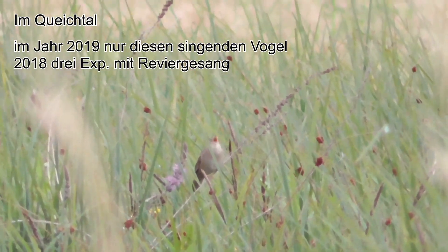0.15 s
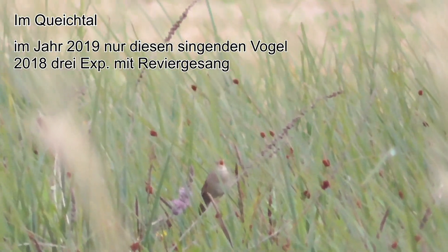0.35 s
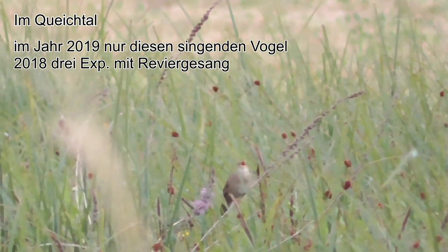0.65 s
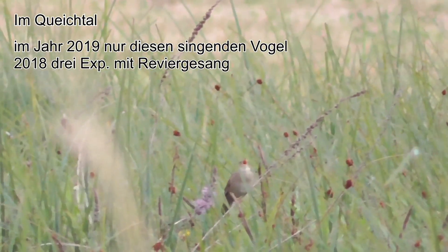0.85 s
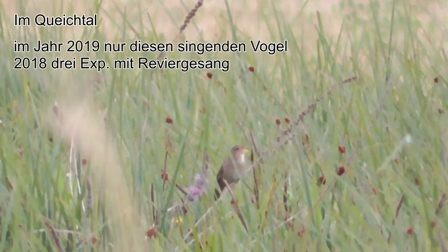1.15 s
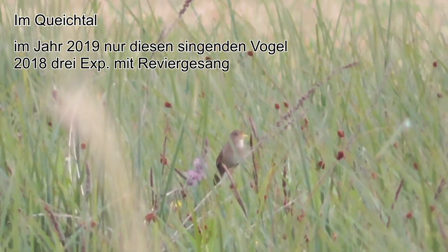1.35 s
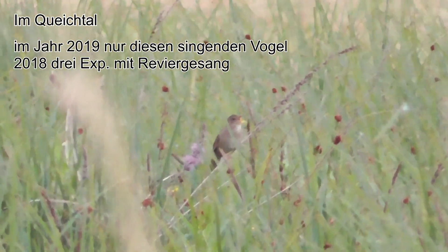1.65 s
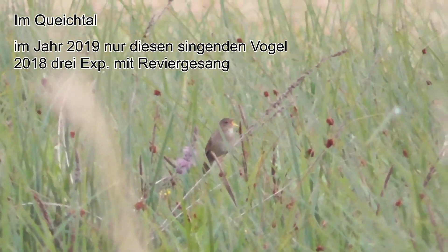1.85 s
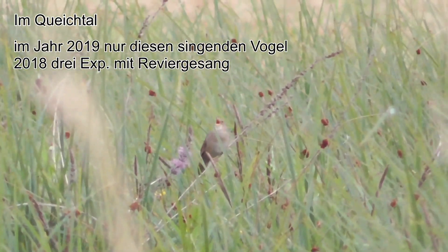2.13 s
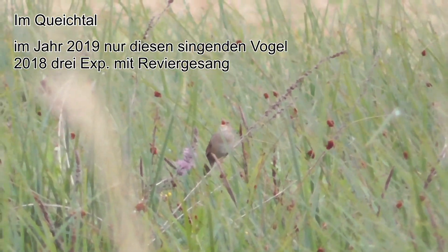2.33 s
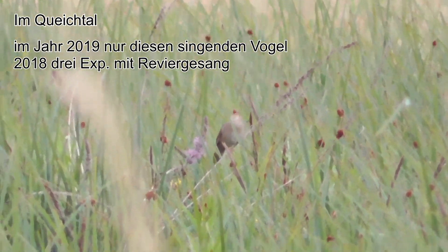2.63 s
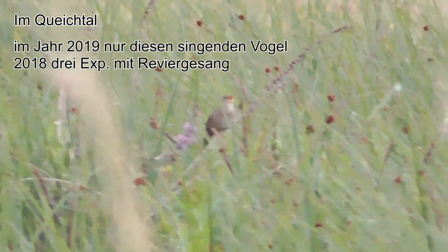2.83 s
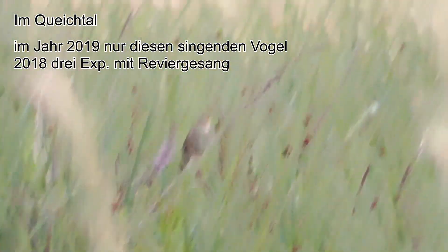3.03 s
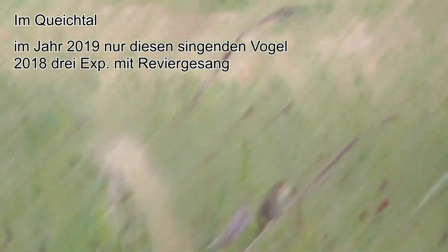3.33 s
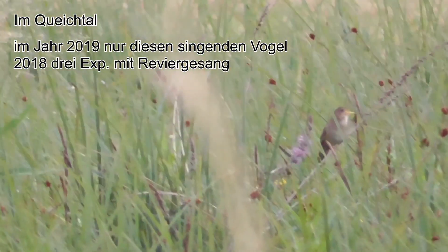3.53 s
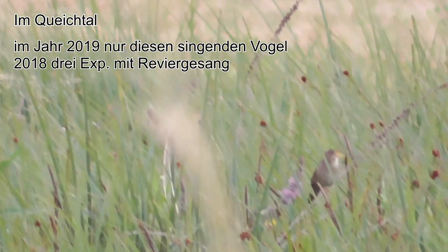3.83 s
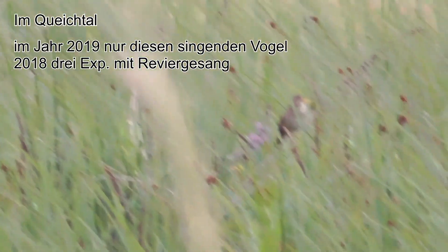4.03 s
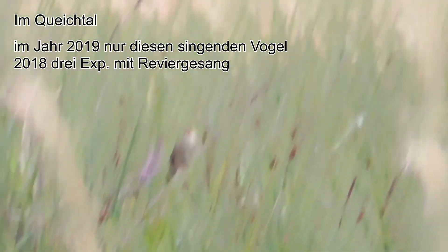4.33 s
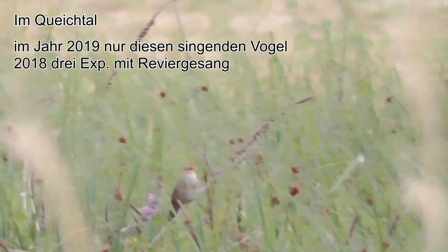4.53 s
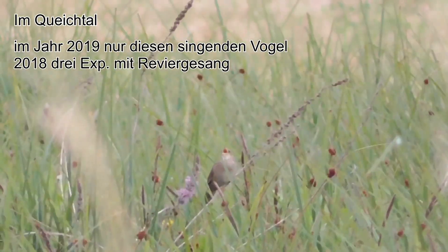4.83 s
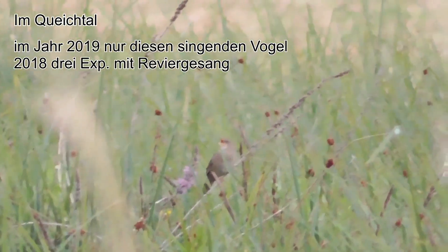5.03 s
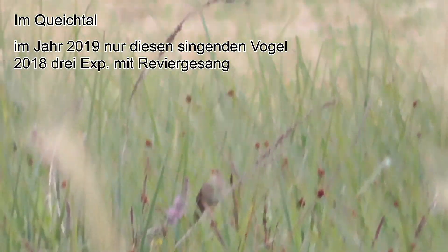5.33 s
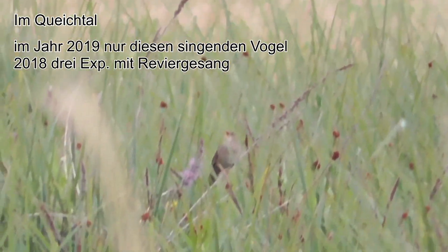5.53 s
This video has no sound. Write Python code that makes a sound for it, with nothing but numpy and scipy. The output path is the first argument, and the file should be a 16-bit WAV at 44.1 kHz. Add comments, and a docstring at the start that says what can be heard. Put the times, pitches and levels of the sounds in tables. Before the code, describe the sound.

In an open meadow, a thin mechanical bird trill rises and continues beneath harsh pulsing cricket chirps, with faint traffic and camera clicks.

```python
"""Close up, a bush-cricket rasps in double strokes, in three runs, as a grasshopper warbler's reel comes up.
The bird's reel is gliding sines, a tick and a short falling note about 25 times a second; the cricket is
noise chopped by file teeth plus a ringing wing. Grainy noise makes the fainter insects, coloured noise the
distant traffic and a faint hiss, narrow noise a wavering hum. The hand-held camera clicks a few times in
damped sines and noise, and a faint pure whine passes."""
import sys
import numpy as np
from scipy import signal
from scipy.fft import rfft, irfft
from scipy.io import wavfile

SR = 44100
rng = np.random.default_rng(int(sys.argv[2]) if len(sys.argv) > 2 else 0)


def put_to_file(sound):
    """Save the sound as 16-bit audio at rate SR, in the file named by the first command-line argument."""
    columns = np.atleast_2d(sound).T  # one column per channel
    safe = np.clip(columns, -1, 1)
    whole_steps = np.round(safe * 32767)
    wavfile.write(sys.argv[1], SR, whole_steps.astype(np.int16))


N = 250047
TIME = np.arange(N) / SR  # [s]

REEL_RATE_HZ, REEL_START_S = 25.2826, -.0074
# The bird's drift around its even beat: (time [s], lag [s])
REEL_LAG = [(0, .005), (.8, .0008), (1.8, -.0014), (3.9, -.0035), (4.5, .002), (4.9, .0033), (5.67, .0027)]
# How strongly the bird sings: (time [s], relative level [dB])
SONG_EFFORT = [(0, -59), (.4, -52), (1.3, -52), (3.3, -50), (4.1, -53.5), (4.7, -50.5), (5.67, -51.5)]
# Glides of one beat, as (time from the tick [ms], pitch [Hz], relative level [dB]):
# the tick
TICK = [(-1.0, 6300, -16), (-.4, 6750, 2), (.2, 7150, 3), (.9, 6900, -14)]
# the tick's overtone, same columns
TICK_OVERTONE = [(-1.6, 12000, -22), (-.9, 10700, -7), (-.3, 9800, -20)]
# the falling note, same columns
NOTE = [(9.3, 6500, -20), (10.4, 5950, -4), (11.5, 5750, -2), (13.9, 5700, 2), (15.4, 5650, -1),
        (17, 5580, -20)]
# the falling note's overtone, same columns
NOTE_OVERTONE = [(9.3, 12300, -16), (11, 12030, -1), (12.6, 11800, -3), (14.4, 11690, 2), (16.3, 11670, -4),
                 (18.6, 11600, -6), (20.5, 11450, -16)]

# Two-stroke chirps of the bush-cricket: (start [s], length [s], then for each stroke in turn:
# delay of its peak [s], half length [s], relative rasp level [dB], relative ring level [dB])
CHIRPS = [(0.027, 0.087, 0.013, 0.007, -36, -39.5, 0.045, 0.016, -41, -37),
          (0.141, 0.077, 0.014, 0.0088, -37, -37.0, 0.042, 0.012, -37, -37),
          (0.235, 0.078, 0.025, 0.009, -35, -37, 0.061, 0.008, -34, -35),
          (0.351, 0.071, 0.016, 0.004, -36.5, -37, 0.046, 0.013, -39.5, -38.5),
          (1.054, 0.072, 0.014, 0.002, -39.5, -32, 0.045, 0.012, -38, -35.5),
          (1.139, 0.074, 0.027, 0.0057, -37, -37.5, 0.058, 0.0064, -38, -37.5),
          (1.24, 0.073, 0.024, 0.005, -38, -34.5, 0.055, 0.0065, -34.5, -38.0),
          (1.35, 0.078, 0.018, 0.0058, -36, -35, 0.057, 0.006, -36.5, -34.5),
          (1.451, 0.082, 0.025, 0.0057, -37, -37, 0.056, 0.007, -39.5, -34.5),
          (1.561, 0.071, 0.016, 0.006, -37, -37, 0.051, 0.0097, -38.5, -38),
          (1.65, 0.078, 0.035, 0.0089, -37, -38, 0.062, 0.008, -37.5, -35.5),
          (1.755, 0.084, 0.031, 0.007, -42, -37.5, 0.061, 0.008, -37, -37.5),
          (1.866, 0.066, 0.025, 0.011, -39.5, -40, 0.067, 0.0061, -33.5, -37),
          (1.978, 0.067, 0.02, 0.006, -37.5, -36, 0.058, 0.01, -39, -39.5),
          (2.091, 0.075, 0.013, 0.0044, -39, -36.0, 0.052, 0.012, -41, -37.5),
          (2.189, 0.082, 0.025, 0.007, -42, -38, 0.06, 0.007, -37.5, -36.5),
          (2.303, 0.075, 0.02, 0.0055, -38, -35.5, 0.06, 0.0052, -35, -32.5),
          (2.419, 0.072, 0.014, 0.007, -34.5, -40, 0.054, 0.007, -37, -34.5),
          (2.529, 0.079, 0.013, 0.005, -36.5, -35.5, 0.047, 0.0093, -40.5, -36.5),
          (2.634, 0.078, 0.018, 0.0053, -44, -36, 0.059, 0.007, -38.5, -38),
          (2.745, 0.086, 0.015, 0.0061, -35, -38, 0.052, 0.0084, -42, -36),
          (2.862, 0.085, 0.012, 0.007, -34, -37, 0.046, 0.0083, -43, -37),
          (2.961, 0.082, 0.017, 0.0066, -49, -38, 0.055, 0.007, -36, -34.5),
          (3.066, 0.088, 0.024, 0.007, -36.5, -37.5, 0.058, 0.0088, -37, -35.0),
          (3.186, 0.087, 0.013, 0.0029, -39, -35.5, 0.048, 0.0088, -38, -37),
          (3.303, 0.088, 0.012, 0.0075, -36.5, -38.5, 0.048, 0.0071, -37, -37),
          (3.417, 0.077, 0.01, 0.006, -34.5, -36, 0.039, 0.017, -38, -40),
          (4.051, 0.066, 0.025, 0.0036, -38.5, -35.5, 0.057, 0.0062, -38, -34.5),
          (4.162, 0.068, 0.015, 0.005, -36.0, -37.0, 0.053, 0.0086, -37.5, -35),
          (4.256, 0.074, 0.025, 0.007, -35.5, -38.5, 0.056, 0.0096, -40, -36.5),
          (4.371, 0.069, 0.015, 0.01, -33.5, -40, 0.045, 0.0065, -37.5, -35.5),
          (4.47, 0.059, 0.026, 0.014, -37, -41.5, 0.051, 0.006, -38, -36.5),
          (4.579, 0.073, 0.02, 0.011, -35.5, -40.5, 0.045, 0.008, -37.5, -35.5),
          (4.682, 0.06, 0.018, 0.0076, -38, -39, 0.048, 0.0084, -34, -34),
          (4.786, 0.077, 0.018, 0.009, -38.5, -42.5, 0.056, 0.0085, -34.0, -36.5),
          (4.88, 0.078, 0.023, 0.0062, -36, -38.5, 0.063, 0.0073, -34, -33.5),
          (4.997, 0.077, 0.014, 0.007, -35, -36.5, 0.056, 0.0067, -34.5, -35),
          (5.114, 0.069, 0.01, 0.004, -35, -39, 0.044, 0.0065, -36, -35.5),
          (5.207, 0.083, 0.021, 0.0054, -37.5, -37, 0.059, 0.0057, -36.5, -36),
          (5.323, 0.068, 0.013, 0.0097, -36.5, -40, 0.051, 0.009, -44, -36),
          (5.439, 0.069, 0.007, 0.008, -35.5, -38.5, 0.042, 0.0088, -39.5, -37),
          (5.533, 0.075, 0.025, 0.0085, -39, -38, 0.054, 0.011, -37, -37),
          (5.647, 0.046, 0.017, 0.006, -38, -38, 0.052, 0.008, -36, -37.0)]
# Tone of the bush-cricket's rasp: (frequency [Hz], relative level [dB])
RASP_COLOUR = [(3000, -64), (5000, -20.5), (5600, -12), (7900, -20.5), (8400, -12), (9000, -11),
               (10200, -3), (11300, -0.5), (12350, -2), (12600, -30), (13500, -16.5), (14500, -61)]

# Tone of the farther insects: (frequency [Hz], relative level [dB])
CHORUS_COLOUR = [(4500, -44), (5200, -27), (5600, -13), (7200, -9), (7900, -15), (8500, -4), (9300, 1),
                 (10000, -3), (11600, -1), (12350, -2), (12600, -15), (13200, -22), (14000, -40)]
# Loudness of the farther insects: (time [s], relative level [dB])
CHORUS_LEVEL = [(0, -45), (.55, -48.5), (1.1, -45), (2.4, -45), (3.4, -44.5), (3.8, -45.5), (4.5, -47),
                (5.67, -45)]

# Clicks of the camera body: (time [s], knock pitch [Hz], knock level [dB], snap pitch [Hz],
# snap level [dB], crack level [dB], left minus right [dB]); the levels are relative
CLICKS = [(0.2735, 835, -29, 3800, -41, -38, 2), (0.276, 835, -37, 4450, -36, -46, 2),
          (3.0575, 840, -43, 3850, -41, -31.5, 2), (3.0785, 700, -41, 1080, -37, -56, 6),
          (3.3205, 915, -40.5, 1250, -49, -54, -2), (3.4455, 450, -48, 1210, -48, -62, 8)]
# Modes of the camera body: (multiple of the knock pitch [ratio], level [dB], share of the ring time [ratio])
BODY_MODES = [(1, -3.5, 0.95), (1.21, -2, 0.99), (1.36, -39, 0.97), (1.74, -22, 1)]
# Faint crackle around two of the clicks: (middle [s], half length [s], level [dB])
CLICK_CRACKLE = [(.272, .02, -55), (3.062, .02, -54.5)]
# Tone of the snapping plastic: (frequency [Hz], relative level [dB])
SHELL_COLOUR = [(300, 0), (1100, 3), (1700, -3), (2200, 2.5), (2800, -2), (3600, 2), (4500, 2), (5500, -3),
                (8000, -6.5), (13000, -13)]

# Tone of the distant traffic: (frequency [Hz], relative level [dB])
TRAFFIC_COLOUR = [(15, -60), (25, -54), (44, -23), (74, -27), (188, -4), (268, -10.5), (446, -10.5),
                  (665, -6), (1060, -4), (1540, -7.5), (1760, -13), (2110, -13.5), (3000, -23.5),
                  (4680, -21.5), (5000, -11.5), (6500, -70), (11000, -120)]
# Second tone curve laid over the traffic: (frequency [Hz], relative level [dB])
TRAFFIC_TILT = [(120, -27.0), (260, 3.5), (4500, -3.5), (9000, -46)]
# Loudness of the distant traffic: (time [s], relative level [dB])
TRAFFIC_LEVEL = [(0.0, -55.5), (0.66, -58), (0.91, -55.5), (2.4, -56), (4.09, -58.5), (4.91, -56),
                 (5.67, -58)]
# A far vehicle's tyre roar: (time [s], centre [Hz], relative level [dB])
TYRES = [(0, 1049, -63.5), (1.1, 1080, -56), (1.8, 996.5, -60), (2.6, 834, -60), (3.6, 783.6, -66.5),
         (5.67, 755, -74)]
# Tone of the deep rumble: (frequency [Hz], relative level [dB])
RUMBLE_COLOUR = [(20, -10.5), (40, -22), (57, -2.0), (72, -8.0), (110, -1.0), (200, -3.5),
                 (330, -42.0), (1000, -54)]
# Loudness of the deep rumble: (time [s], level [dB])
RUMBLE_LEVEL = [(0, -62), (.8, -63.5), (1.3, -65.5), (3.9, -67), (4.3, -59.5), (4.7, -61.5), (5.67, -61.5)]
# Swells of the low hum: (peak time [s], half length [s], centre [Hz], level [dB])
HUM_SWELLS = [(0.081, 0.17, 182.5, -62), (0.515, 0.079, 158.8, -61), (1.458, 0.1, 184, -63),
              (2.81, 0.64, 194.8, -65.5), (3.657, .11, 206, -60), (4.098, 0.12, 200.9, -58.5),
              (5.181, 0.22, 195.1, -59.5), (5.595, 0.088, 183.9, -62)]

# The thin whine, a single row: (start [s], end [s], pitch [Hz], level [dB], left minus right [dB])
WHINE = (2.63, 3.27, 12230, -56, -17)
# Tone of the faint hiss: (frequency [Hz], relative level [dB])
HISS_COLOUR = [(1200, -44), (2000, -0.5), (2600, -0.5), (3400, -6), (5000, -14), (8000, -48)]
# Loudness of the faint hiss: (time [s], relative level [dB])
HISS_LEVEL = [(0, -103), (3.2, -70.5), (4.3, -70.5), (5, -68.5), (5.67, -71)]


def warbler(overtone_db=2.5, flare_db=9):
    """Tick and falling note alternate; their high overtones flutter, and flare while a chirp sounds."""
    tick = whistle(TICK, scatter_db=1.6, detune=.02, slip_ms=.2, stretch=.2, swoop=.4)
    note = whistle(NOTE, scatter_db=1.5, detune=.005, slip_ms=.25, stretch=.12, swoop=.25)
    overtones = whistle(NOTE_OVERTONE, scatter_db=1.2, detune=.0015, slip_ms=.3, stretch=.05, swoop=.1)
    overtones = overtones + whistle(TICK_OVERTONE, scatter_db=2, detune=.02, slip_ms=.2, stretch=.2, swoop=.2)
    note = note * (1 + .35 * wander(600).real)
    overtones = overtones * (1 + .5 * wander(700, channels=2).real)

    flare = np.minimum(sum(chirping(TIME - s, length) for s, length, *_ in CHIRPS), 1)
    song = tick * pan(0.9) * undb(1.3)
    song = song + note * pan(-2) * undb(-.5)
    song = song + overtones * pan(-2) * undb(overtone_db + flare_db * flare)
    # the ground returns a weak early echo
    song = song + undb(-17) * np.roll(song, int(.0048 * SR), axis=1)
    return grass(song * undb(curves(SONG_EFFORT)[0]), t60_s=.05, wet_db=-13)


def whistle(shape, scatter_db, detune, slip_ms, stretch, swoop):
    """One gliding sine on every beat, each different in time, pitch, strength, length and depth of glide."""
    beats = (TIME - curves(REEL_LAG)[0] - REEL_START_S) * REEL_RATE_HZ
    # each beat's window opens a quarter beat before its tick
    index = np.floor(beats + 1 / 4).astype(int)
    slip, pitch, size, length, depth = rng.standard_normal((index[-1] + 1, 5))[index].T

    at_ms, hz, db = np.transpose(shape)
    ms = (beats - index) / REEL_RATE_HZ * 1000 + slip_ms * slip
    ms = at_ms.mean() + (ms - at_ms.mean()) * np.exp(stretch * length)

    middle_hz = np.median(hz)
    glide = (np.interp(ms, at_ms, hz) - middle_hz) * np.exp(swoop * depth)
    phase = 2 * np.pi * np.cumsum((middle_hz + glide) * (1 + detune * pitch)) / SR
    loudness = np.interp(ms, at_ms, undb(db), left=0, right=0) * undb(scatter_db * size)
    return loudness * np.sqrt(2) * np.sin(phase)


def bush_cricket(ring_hz=9375, turn_db=-5):
    """Two strokes a chirp drag the file over the scraper; at the peak of each the wing's resonance rings out."""
    rasp_power, ring_power = np.zeros(N), np.zeros(N)
    for s, length, *columns in CHIRPS:
        span = slice(max(int(s * SR) - SR // 100, 0), int(s * SR) + SR // 7)
        t = TIME[span] - s
        # one row per stroke
        peak, half, rasp_db, ring_db = np.reshape(columns, (2, -1)).T[:, :, None]
        gate = chirping(t, length)
        speed = np.exp(-np.abs((t - peak) / half) ** 3)
        stroke_db = np.where(t < peak.mean(), rasp_db[0], rasp_db[1])
        # the rasp dips where the wings turn
        dip_db = turn_db * (1 - speed.max(axis=0))
        rasp_power[span] += (undb(stroke_db + dip_db) * gate) ** 2
        ring_power[span] += np.sum((undb(ring_db) * gate) ** 2 * speed, axis=0)

    file = teeth(rate_hz=480, jitter=.3, ring_share=.62, scatter_db=1)
    buzz = unit(sum(wing_band(hz) for hz in range(8500, 13000, 1000))) + .4 * pair(.25)
    scrape = unit(colour(buzz * file, RASP_COLOUR)) * np.sqrt(rasp_power) * pan(-2.6) * undb(-0.15)

    # the ring's pitch wobbles; its steady part trails by 1.4 radians on the left
    phase = 2 * np.pi * np.cumsum(ring_hz + 250 * wander(600)[0].real) / SR
    wing = np.exp(1j * np.array([[-1.4], [0]])) + .7 * wander(1000, channels=2)
    ring = unit((wing * np.exp(1j * phase)).real) * np.sqrt(ring_power) * pan(0.1) * undb(0.1)
    return grass(scrape + ring, t60_s=.04, wet_db=-24)


def chirping(t, length):
    """Loudness of a chirp: it starts abruptly, holds and dies away."""
    edge_s, tail_s = .002, .003
    return np.clip(t / edge_s + .5, 0, 1) * np.exp(-np.maximum(t - length, 0) / tail_s)


def teeth(rate_hz, jitter, ring_share, scatter_db):
    """Loudness of a scraper slipping over a file: every tooth is a burst that dies away."""
    travel = np.cumsum(rate_hz * np.exp(jitter * wander(300)[0].real)) / SR
    index = travel.astype(int)
    size = undb(scatter_db * rng.standard_normal(N))[index]
    # ring_share is the decay time as a share of the tooth spacing
    return unit(size * np.exp(-(travel - index) / ring_share))


def wing_band(hz):
    """One broad resonance of the wing, swelling and fading on its own."""
    shape = [(hz - 1200, -40), (hz - 400, -2), (hz, 0), (hz + 400, -2), (hz + 1200, -40)]
    return colour(pair(.25), shape) * undb(2.8 * wander(120)[0].real)


def chorus():
    """Farther insects merge into a grainy sizzle that drops away briefly between their chirps."""
    grain = teeth(rate_hz=500, jitter=.5, ring_share=1.5, scatter_db=2.2)
    # dips just under 9 times a second
    between = (.5 + .5 * np.cos(2 * np.pi * 8.98 * (TIME - .598))) ** 4
    flicker = undb(2 * wander(110, channels=2).real + 1.5 * wander(90).real - 5 * between)
    sizzle = unit(colour(pair(0.083) * grain, CHORUS_COLOUR))
    return sizzle * flicker * pan(0.96) * undb(curves(CHORUS_LEVEL)[0])


def camera(knock_t60_s=0.047):
    """Fingers make the body knock in damped modes, its plastic crack as noise and a loose part ring."""
    snap_t60_s, crack_t60_s, contact_s = .018, .016, .0003
    knocks, cracks, pings = np.zeros((3, 2, N))
    t = TIME[:SR // 8]
    fade = -np.log(1000) * t  # divided by a t60 it gives a 60 dB decay
    push = 1 - np.exp(-t / contact_s)
    for s, knock_hz, knock_db, snap_hz, snap_db, crack_db, pan_db in CLICKS:
        span = slice(int(s * SR), int(s * SR) + len(t))
        blow = pan(pan_db) * push
        body = 0
        for ratio, db, share in BODY_MODES:
            mode = np.sin(2 * np.pi * ratio * knock_hz * t) * np.exp(fade / (share * knock_t60_s))
            body = body + undb(db) * mode
        snap = np.sin(2 * np.pi * snap_hz * t) * np.exp(fade / snap_t60_s)
        knocks[:, span] += blow * undb(knock_db) * body
        pings[:, span] += blow * undb(snap_db) * snap
        cracks[:, span] += blow * undb(crack_db) * np.exp(fade / crack_t60_s)

    # loose parts roughen the knock and the snap's own pitch
    clicks = knocks * (1 + .25 * wander(400, channels=2).real)
    clicks = clicks + pings * (1 + 1.2 * wander(1100, channels=2).real)
    clicks = clicks + cracks * unit(colour(pair(0.28), SHELL_COLOUR))
    return grass(clicks + click_crackle(), t60_s=.07, wet_db=-13)


def click_crackle():
    """Faint grainy noise, a run of irregular small bursts, swells and fades around two of the clicks."""
    grain = teeth(rate_hz=350, jitter=.6, ring_share=.5, scatter_db=3)
    swells = sum(undb(db) * np.exp(-((TIME - s) / half) ** 2) for s, half, db in CLICK_CRACKLE)
    return swells * unit(colour(pair(0.9) * grain, SHELL_COLOUR))


def field():
    """Distant traffic off to the right, a deep rumble and a low hum that wavers in pitch."""
    left, right = pair(0.093)
    # the left ear hears it 11 samples later
    murmur = np.array([np.roll(left, 11), right])
    murmur = colour(colour(murmur, TRAFFIC_COLOUR), TRAFFIC_TILT)
    traffic = unit(murmur) * pan(-1.6) * undb(curves(TRAFFIC_LEVEL)[0] + 1.5)
    rumble = unit(colour(pair(0.7), RUMBLE_COLOUR)) * undb(curves(RUMBLE_LEVEL)[0])
    return traffic + tyres() + rumble + hum()


def tyres():
    """One far vehicle's roar, a band of noise, swells early and then sinks in pitch as it draws away."""
    hz, db = curves(TYRES)
    band = wander(650) + .6 * wander(650, channels=2)
    roar = unit((band * np.exp(2j * np.pi * np.cumsum(hz) / SR)).real)
    left, right = roar * undb(db)
    return np.array([np.roll(left, 13), right]) * pan(-3)


def hum():
    """A low band of noise swells and fades, a little higher or lower each time."""
    peaks, _, hz, _ = np.transpose(HUM_SWELLS)
    phase = 2 * np.pi * np.cumsum(np.interp(TIME, peaks, hz)) / SR
    swells = sum(undb(db) * np.exp(-((TIME - s) / half) ** 2 / 2) for s, half, _, db in HUM_SWELLS)
    band = wander(53.7) + 0.25 * wander(82, channels=2)
    return swells * unit((band * np.exp(1j * phase)).real)


def whine():
    """A faint, very high steady sine comes and goes once on the right."""
    start, end, hz, db, pan_db = WHINE
    gate = np.clip(np.minimum(TIME - start, end - TIME) / .02, 0, 1)
    return pan(pan_db) * undb(db) * gate * np.sin(2 * np.pi * hz * TIME)


def hiss():
    """A faint fluttering band of noise, louder in the second half."""
    flutter = undb(2 * wander(20)[0].real)
    return unit(colour(pair(0.25), HISS_COLOUR)) * flutter * undb(curves(HISS_LEVEL)[0])


def grass(x, t60_s, wet_db):
    """Stems scatter a short diffuse tail, different at each ear."""
    t = TIME[:SR // 8]
    tail = rng.standard_normal((2, len(t))) * np.exp(-np.log(1000) * t / t60_s)
    tail /= np.sqrt(np.sum(tail ** 2, axis=1, keepdims=True))
    return x + undb(wet_db) * signal.fftconvolve(np.atleast_2d(x), tail, axes=1)[:, :N]


def undb(db):
    """Decibels to gain."""
    return 10 ** (np.asarray(db) / 20)


def unit(x):
    """Scale to rms 1."""
    return x / np.sqrt(np.mean(np.abs(x) ** 2))


def curves(table):
    """The columns of a table, joined by straight lines in time."""
    s, *columns = np.transpose(table)
    return [np.interp(TIME, s, c) for c in columns]


def pan(db):
    """Left and right gains for a level difference, left minus right."""
    return undb(np.array([[db], [-db]]) / 2)


def colour(x, points):
    """Shape a sound's spectrum with (frequency [Hz], level [dB]) points, joined along log frequency."""
    hz, db = np.transpose(points)
    f = np.maximum(np.arange(N // 2 + 1) * SR / N, 1)
    gain = undb(np.interp(np.log(f), np.log(hz), db))
    return irfft(rfft(x) * gain, N)


def wander(width_hz, channels=1):
    """Complex noise that changes no faster than its bandwidth allows."""
    sos = signal.butter(4, width_hz / 2, fs=SR, output="sos")
    z = rng.standard_normal((channels, N)) + 1j * rng.standard_normal((channels, N))
    return unit(signal.sosfilt(sos, z))


def pair(likeness):
    """Left and right noises that share a part; likeness is their correlation."""
    mid, side = rng.standard_normal((2, N))
    sides = np.array([side, -side])
    return (np.sqrt(1 + likeness) * mid + np.sqrt(1 - likeness) * sides) / np.sqrt(2)


def scene():
    """Bird, insects, the camera itself, far background, a faint whine and a faint hiss."""
    return warbler() + bush_cricket() + chorus() + camera() + field() + whine() + hiss()


def record(dry):
    """The recorder cuts the top steeply, above 13.8 kHz."""
    steep_cut = signal.ellip(8, .2, 70, 13800, fs=SR, output="sos")
    return signal.sosfilt(steep_cut, dry)


dry = scene()
out = record(dry)
put_to_file(out)
```